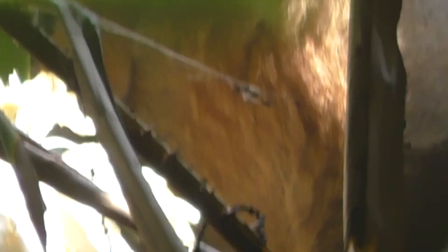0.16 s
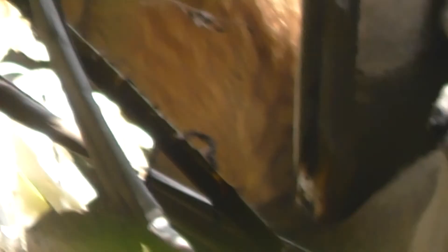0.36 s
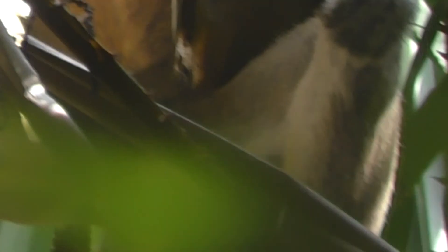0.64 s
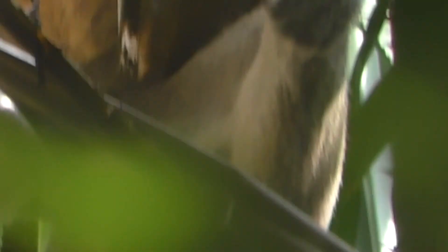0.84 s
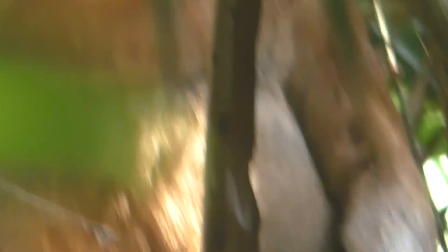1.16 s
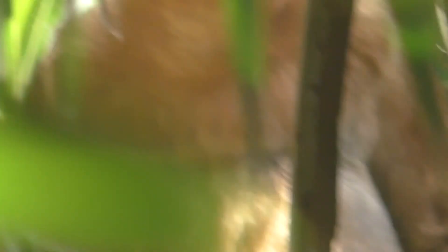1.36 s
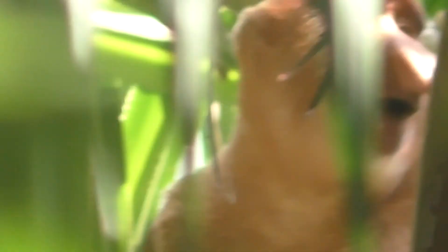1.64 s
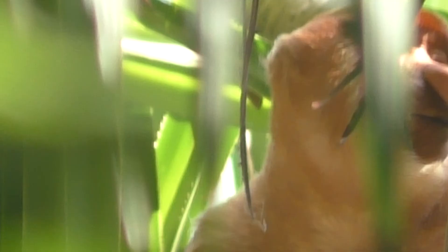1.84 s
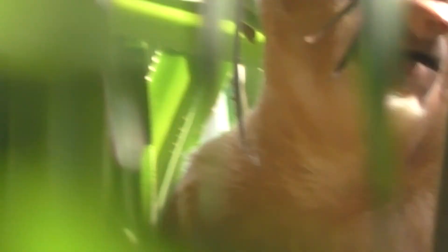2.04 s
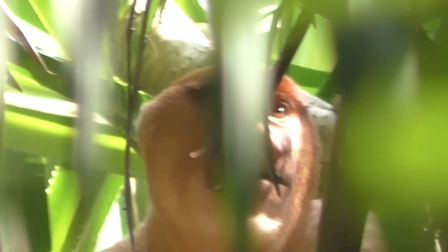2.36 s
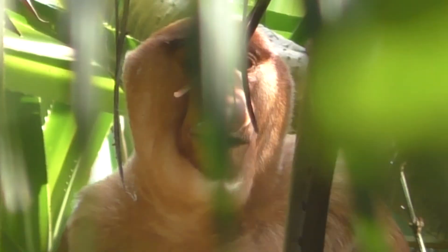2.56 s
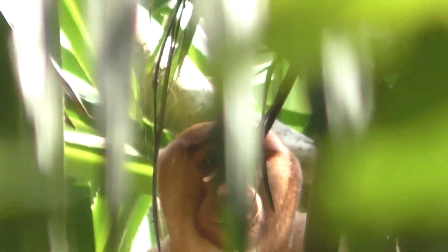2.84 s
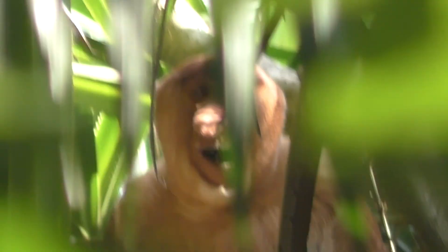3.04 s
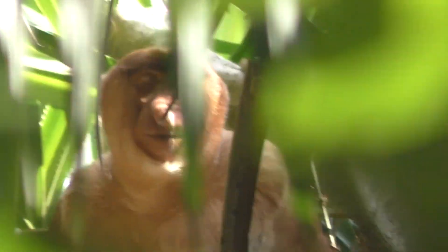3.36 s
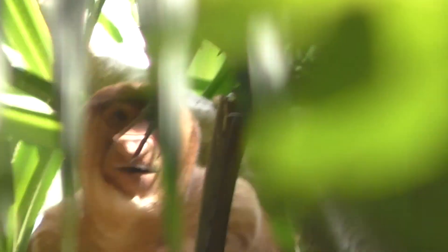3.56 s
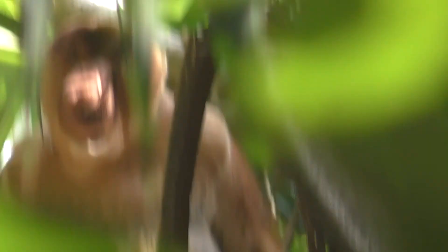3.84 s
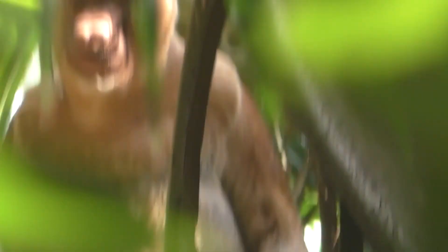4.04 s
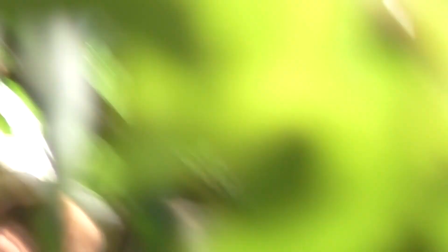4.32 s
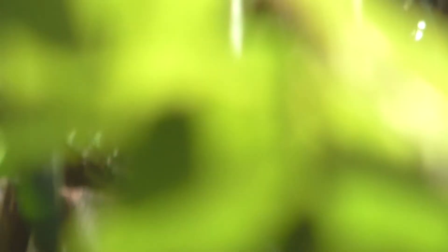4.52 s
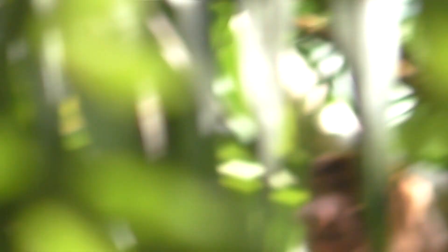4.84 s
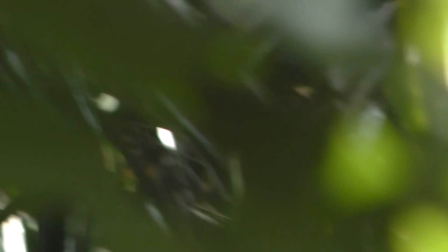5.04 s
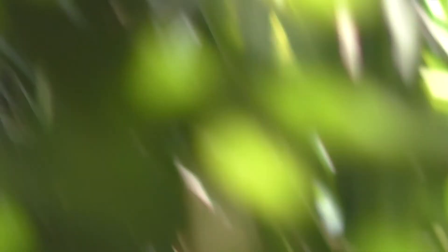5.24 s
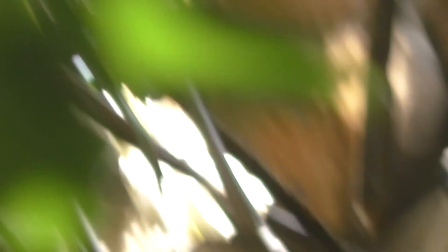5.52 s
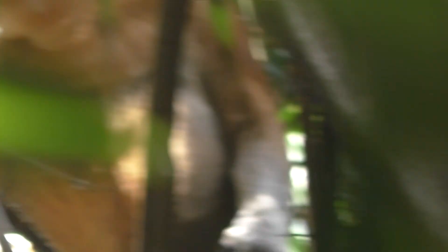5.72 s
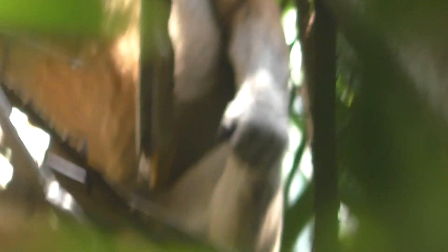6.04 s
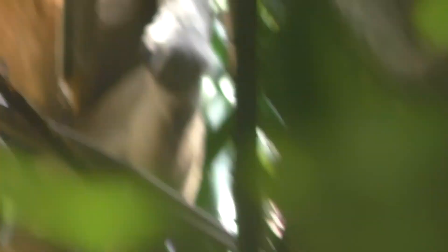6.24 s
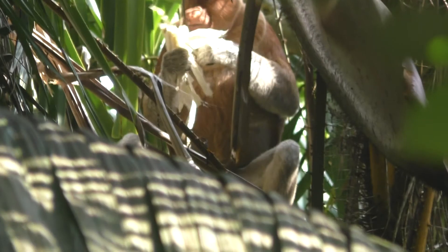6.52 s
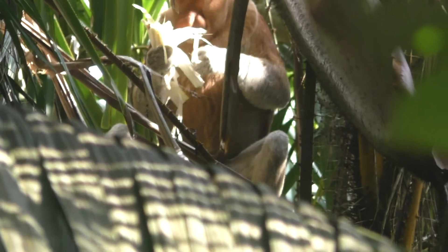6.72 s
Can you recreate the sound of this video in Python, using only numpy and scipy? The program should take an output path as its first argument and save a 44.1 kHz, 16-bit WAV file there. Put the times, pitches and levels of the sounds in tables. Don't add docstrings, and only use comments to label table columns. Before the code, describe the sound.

Outdoor stereo sound, dry and open, dominated by one shrill cicada. Its buzzing rasp tightens into a piercing whine around 3 kHz with stronger overtones high above, flickering through foliage, then breaks back into a dying rasp. This repeats four times over soft air and far insects. After an abrupt blink of silence comes a short remnant call, with small twig knocks, leaf clicks and brushing.

```python
import sys
import numpy as np
from scipy import signal
from scipy.fft import rfft, irfft, next_fast_len
from scipy.io import wavfile
from scipy.ndimage import uniform_filter1d, map_coordinates

SR = 44100
rng = np.random.default_rng(int(sys.argv[2]) if len(sys.argv) > 2 else 0)


def boost_factor(decibels):
    exponent = np.asarray(decibels, float) / 20
    return 10 ** exponent


def store_wav(level_fs):
    pcm = np.round(np.clip(np.atleast_2d(level_fs), -1, 1) * 32767)
    wavfile.write(sys.argv[1], SR, pcm.T.astype(np.int16))


N = 303849
T = np.arange(N) / SR

# (start [s], end [s])
GAP_S = (6.3946, 6.4)
TOP_HZ = 15830

# (frequency [Hz], density [dB per Hz])
RUMBLE_SPECTRUM = [(15, -58), (25, -11), (43, -22.5), (64, -8.5), (123, -9), (147, -7), (179, -8),
                   (221, -4), (253, -7.5), (352, -4.5), (600, -13.5), (780, -34), (1320, -120)]
# (frequency [Hz], density [dB per Hz])
LEAF_SPECTRUM = [(400, -40), (600, -10), (720, -2), (860, -6), (1160, -1), (2400, -6.5), (3600, -8),
                 (4300, -14.5), (10000, -12.5), (13500, -12), (15000, -42), (15900, -13)]
# (frequency [Hz], density [dB per Hz])
CHORUS_SPECTRUM = [(3900, -26), (5000, -10), (5700, -2.5), (6150, -0.5), (6600, -7.5), (7300, -11),
                   (9000, -22.5), (11000, -29.5)]
# (frequency [Hz], correlation [0-1])
LIKENESS = [(60, 0.11), (130, 0.41), (640, 0.63), (1400, 0.37), (3000, 0.7), (6000, 0.85), (7200, 1),
            (12000, 1)]
# (time [s], level [dB])
BREEZE = [
    (0, -53.5),
    (.13, -52),
    (.33, -55),
    (1.9, -57),
    (4.13, -57.5),
    (4.3, -52.5),
    (5.16, -55),
    (5.62, -57),
    (5.89, -55),
    (6.89, -53.5),
]
# (frequency [Hz], blur rate [knots/s], level [dB])
HUM_LINES = [(112, 13, -3), (153.7, 12, 3)]
# (time [s], half width [s], level [dB])
HUM_SWELLS = [
    (1.3, .5, -3),
    (2.2, 0.45, 3),
    (4.2, .4, -4),
    (6.55, .15, 6),
]

# (lock start [s], lock end [s], start pitch [Hz], sag [Hz/s])
PHRASES = [
    (0.153, 0.737, 3058, 57.9),
    (1.832, 2.313, 3042.5, 55.8),
    (3.53, 4.038, 3047, 62.1),
    (5.225, 5.798, 3043.6, 59.2),
    (6.399, 6.495, 3020, 59.7),
]
# (time [s], partial 4 [dB], dying [dB/s], held down under lock [dB], later pitch lift [Hz])
BREAKS = [
    (0.551, -33, 17, 0, 12.3),
    (2.421, -33, 24, 5, 54),
    (4.1, -31.5, 26, 12, 41),
    (5.86, -33, 29, 8, 70),
    (6.48, -33, 57, 0, 55),
]
CLICK_HZ = 323
LOCK_IN_S, LET_GO_S = 0.049, 0.03
HIGH_LINGERS_S, SECOND_EARLY_S = 0.08, 0.014
LEAD_S, ENTRY_DB, SETTLE_S = 0.13, -1.5, 0.14
MURMUR_DB, PAUSE_S, PAUSE_DB = -53, 0.079, -2
LOW_DB, LOW_FOLLOWS, LOW_HELD_DB = -45, 0.64, 4
REST_HZ, LIFT_HZ, LIFT_S = 2991, 37.9, 0.25
# (over partial 1 [dB], over partial 4 [dB], side [dB])
RASP_LEVELS = [(-0.5, -60, -9.5), (-4.5, -15.5, -19), (-8, -37, -16.5), (-40, -1.5, -27), (-20.5, -46, -32)]
# (shift [Hz], half width [Hz])
RASP_BANDS = [(85, 195), (0, 320), (70, 310), (25, 315), (-60, 380)]
# (shift [Hz], half width [Hz], level [dB])
RASP_SKIRT = (120, 1500, -17)
SIDEBANDS = [(-36, -21, -17, -22, -13.5, -22), (-36, -27, -15, -27, -21, -33),
             (-23, -7, -10, -30, -12, -20), (-40, -20, -16, -28, -15, -23), (-14, -14, -12, -30, -18, -24)]
# (shift [Hz], half width [Hz], level re partial [dB])
HAZE = [(0, 450, -23.5), (0, 680, -16), (-300, 1300, -6), (294, 750, -15.5), (-500, 700, 0)]
# (partial 1 [dB], partial 2 [dB], partial 3 [dB], partial 4 [dB])
PATHS = [(-39.5, -45.5, -55, -26.5), (-41.5, -35, -46.5, -29), (-40.5, -36, -46.5, -30.5),
         (-41, -37.5, -53, -29.5), (-50, -42, -59, -48)]
# (click shake [dB], echo beating of partial 1 [dB], of upper partials [dB])
SHAKE = [(-2, -9, -4), (-1, -8, -7), (0, -14, -7), (2, -14, -8), (0, -9, -9)]
# (time [s], half width [s], depth [dB])
CANCELS_1 = [(.16, 0.06, 7.5), (.22, 0.0074, 13), (.275, 0.011, 18), (.34, 0.015, 12.5), (.42, 0.024, 7),
             (.525, 0.006, 11), (.69, 0.1, 5.5), (1.9, 0.021, 4.5), (2.07, 0.019, 10), (3.73, 0.061, 9),
             (3.95, 0.019, 7.5), (5.35, .17, 11), (5.6, 0.021, 12)]
# (time [s], half width [s], depth [dB])
CANCELS_2 = [(.2, .08, 10), (.62, .08, 9.5), (1.86, 0.033, 10), (1.95, 0.049, 4), (2.075, 0.015, 9.8),
             (2.115, 0.012, 10), (2.31, 0.043, 10), (3.62, 0.14, 6.9), (3.96, 0.024, 12), (4.01, .05, 4.6),
             (5.22, 0.057, 12), (5.4, 0.11, 3.4), (5.615, 0.016, 12), (5.74, 0.064, 8.2)]
# (time [s], half width [s], depth [dB])
CANCELS_3 = [(.75, .1, 7), (2, .12, 11), (2.35, 0.078, 12), (3.62, 0.13, 11), (4.05, .1, 12),
             (5.49, 0.026, 9)]
# (time [s], half width [s], depth
# [dB])
CANCELS_4 = [(.2, 0.074, 8.6), (.5, 0.017, 10), (.76, .2, 18), (1.95, 0.032, 8.6), (2.035, 0.015, 7.2),
             (2.125, 0.01, 7.3), (2.18, .04, 5.7), (2.4, 0.048, 9.4), (3.63, 0.063, 8), (3.8, .015, 6),
             (3.94, 0.027, 9.3), (4.03, 0.0074, 10), (4.065, 0.0064, 6), (5.42, 0.034, 3),
             (5.78, 0.033, 9.1), (5.88, .07, 9.3), (6.46, .02, 12)]

# (time [s], peak [dB], pitch [Hz], t60 [s], pan [dB])
TICKS = [(4.27, -53, 732, 0.036, 7), (4.31, -46.5, 718, 0.12, -1), (4.68, -44, 1090, 0.044, 10),
         (6.414, -41, 183, 0.08, -2), (6.477, -43.5, 110, 0.074, 18), (6.499, -44, 150, 0.022, 8),
         (6.525, -47, 170, 0.033, 0), (6.567, -39, 190, .025, 0), (6.508, -36, 8800, .006, 0),
         (6.48, -46, 2050, .015, 0), (6.6, -35, 1500, 0.033, 7), (6.608, -31.5, 1110, 0.016, 4),
         (6.607, -38, 4670, 0.011, 2), (6.73, -40.5, 983, 0.043, 2), (6.765, -42, 850, .04, 0),
         (6.766, -36, 2900, 0.017, -3), (6.794, -37, 2400, .012, 9), (6.852, -32.5, 1200, 0.0092, -5),
         (6.863, -37.5, 440, 0.027, -2), (6.865, -34, 2860, 0.0068, -2)]
# (time [s], peak [dB], half length [s])
STROKES = [
    (6.452, -44.5, .02),
    (6.48, -42, .012),
    (6.508, -47, .015),
    (6.57, -47.5, 0.039),
    (6.606, -41, .003),
    (6.77, -54, 0.023),
    (6.863, -50, .004),
]


def unit(x):
    return x / np.sqrt(np.mean(np.abs(x) ** 2) + 1e-20)


def along(points, hz):
    f, v = np.transpose(points)
    return np.interp(np.log(hz + 1), np.log(f + 1), v)


def bump(t, s, width_s):
    return np.exp(-((t - s) / width_s) ** 2)


def ramp(t, length_s):
    return np.clip(t / length_s, 0, 1)


def wobble(rate, n=N):
    knots = rng.standard_normal(n * 600 // SR + 8)
    return map_coordinates(knots, [np.arange(n) * min(rate, 600) / SR])


def fading(rate, n=N):
    return (wobble(rate, n) + 1j * wobble(rate, n)) / np.sqrt(2)


def spread(mid, side, side_db):
    return np.array([mid + boost_factor(side_db) * side, mid - boost_factor(side_db) * side])


def blur(shift_hz, width_hz, steep, n=N):
    m = next_fast_len(n)
    hz = np.fft.fftfreq(m, 1 / SR)
    shape = (1 + ((hz - shift_hz) / width_hz) ** 4) ** -steep
    bins = np.exp(2j * np.pi * rng.random((2, m))) * rng.rayleigh(size=(2, m))
    return unit(np.fft.ifft(shape * bins)[:, :n])


def rush(spectrum, patchy_db):
    z = signal.stft(rng.standard_normal((2, N + 512)), nperseg=512)[2]
    patches = uniform_filter1d(rng.standard_normal(z.shape[1:]), size=6, axis=0)
    patches = uniform_filter1d(patches, size=14, axis=1)
    pair = signal.istft(z * boost_factor(patchy_db * unit(patches)), nperseg=512)[1]
    hz = np.fft.rfftfreq(pair.shape[1], 1 / SR)
    turn = np.arccos(np.clip(along(LIKENESS, hz), -1, 1)) / 2
    gain = boost_factor(along(spectrum, hz)) * [np.cos(turn), np.sin(turn)]
    mid, side = irfft(rfft(pair) * gain, pair.shape[1])[:, :N]
    return unit(spread(mid, side, 0))


def forest():
    breeze_db = np.interp(T, *np.transpose(BREEZE))
    rumble = boost_factor(0.48 * (breeze_db + 56.5) - 56) * rush(RUMBLE_SPECTRUM, patchy_db=0.5)
    leaves_db = 0.79 * (breeze_db + 58) - 52.5 + 0.15 * wobble(5.6)
    leaves = boost_factor(leaves_db) * rush(LEAF_SPECTRUM, patchy_db=0.88)
    chorus = boost_factor(-48 + 0.4 * wobble(1.5)) * rush(CHORUS_SPECTRUM, patchy_db=1.07)

    hum_db = -65.5 + sum(db * bump(T, s, width_s) for s, width_s, db in HUM_SWELLS)
    hum = 0
    for hz, knots, db in HUM_LINES:
        hum = hum + boost_factor(db) * (1 + 0.5 * fading(knots)) * np.exp(2j * np.pi * hz * T)
    hum = spread(hum, hum * fading(6), -12).real
    lean_right = boost_factor([[-0.4], [0.4]])
    return boost_factor(hum_db) * hum + lean_right * (rumble + leaves) + chorus


def rasp_effort():
    pitch_hz, murmur_db = np.full(N, REST_HZ, float), np.full(N, MURMUR_DB, float)
    power, under_lock = np.zeros(N), np.zeros(N)
    for (start, end, *_), (s, db, dying_db, held_db, after_hz) in zip(PHRASES, BREAKS):
        resumed = start > GAP_S[0]
        audible = T > GAP_S[1] * resumed
        since, after = T - start + resumed, np.maximum(T - s, 0)
        to_break = ramp(s - T, SETTLE_S)
        locked = ramp(since, SETTLE_S) * to_break * audible
        level_db = db - dying_db * after - held_db * locked + ENTRY_DB * to_break
        swell = ramp(since + LEAD_S, LEAD_S) ** 2
        power += (swell * boost_factor(level_db)) ** 2 * audible
        release = ramp(end + LET_GO_S - T, SETTLE_S / 2)
        under_lock += ramp(since, SETTLE_S) * release * (not resumed)
        murmur_db -= PAUSE_DB * bump(since, -LEAD_S - PAUSE_S / 2, PAUSE_S)
        pitch_hz += LIFT_HZ * bump(since, 0, LIFT_S / 2)
        pitch_hz += after_hz * after / LIFT_S * np.exp(1 - after / LIFT_S)
    high_db = 10 * np.log10(power + boost_factor(murmur_db) ** 2)
    low_db = LOW_DB + LOW_FOLLOWS * (high_db + 33) - LOW_HELD_DB * under_lock
    return pitch_hz, high_db, low_db


def rasp():
    pitch_hz, high_db, low_db = rasp_effort()
    phase = 2 * np.pi * np.cumsum(pitch_hz) / SR
    throb = boost_factor(0.7 * wobble(30))
    out = np.zeros((2, N))
    for k, ((over_low_db, over_high_db, side_db), band) in enumerate(zip(RASP_LEVELS, RASP_BANDS)):
        size = np.hypot(boost_factor(low_db + over_low_db), boost_factor(high_db + over_high_db))
        carrier = np.sqrt(2) * size * throb * np.exp(1j * (k + 1) * phase)
        out += spread(*(carrier * blur(*band, steep=0.9)), side_db).real
    shift_hz, width_hz, skirt_db = RASP_SKIRT
    skirt = boost_factor(high_db + skirt_db) * np.exp(4j * phase) * blur(shift_hz, width_hz, 0.5)
    return out + spread(*skirt, -22).real


def click_sidebands(t, bands_db, shake_db, rate):
    click = CLICK_HZ * t + rng.random()
    total = 0
    for m, under_db in zip((-3, -2, -1, -0.5, 1, 2), bands_db):
        line = np.exp(2j * np.pi * (m * click + (m % 2) * (m < 0) / 2))
        total = total + boost_factor(under_db + shake_db) * (0.85 + 0.5 * fading(rate, len(t))) * line
    return total


def whine():
    side_db = (-12, -17, -17, -19, -30)
    cancels = (CANCELS_1, CANCELS_2, CANCELS_3, CANCELS_4)
    out = np.zeros((2, N))
    for (start, end, hz, sag), path_db, (shake_db, *beat_db) in zip(PHRASES, PATHS, SHAKE):
        span = slice(round(start * SR), round((end + HIGH_LINGERS_S + LET_GO_S) * SR))
        t = T[span]
        n = len(t)
        levels_db = []
        for db, nulls in zip(path_db, cancels):
            levels_db.append(db - sum(depth * bump(t, s, width_s) for s, width_s, depth in nulls))
        levels_db.append(levels_db[3] - 40)
        phase = 2 * np.pi * np.cumsum(hz - sag * (t - start)) / SR
        begun = ramp(t - start + (start > GAP_S[0]), LOCK_IN_S)
        for k, (db, bands_db, apart_db, haze) in enumerate(zip(levels_db, SIDEBANDS, side_db, HAZE)):
            shift_hz, width_hz, haze_db = haze
            past = t - end
            lock_past = past - HIGH_LINGERS_S * ((k > 1) - 0.5)
            lock = begun * (1 - ramp(lock_past, HIGH_LINGERS_S / 2 + LET_GO_S))
            held_past = past - HIGH_LINGERS_S * (k > 1) + SECOND_EARLY_S * (k == 1)
            held = begun * (1 - ramp(held_past, LET_GO_S))
            beating = boost_factor(beat_db[k > 0] - 5 * (k == 1)) * fading(48, n)
            body = held * boost_factor(db) * (1 + beating)
            singer = lock * uniform_filter1d(boost_factor(db), size=SR // (1 + k))
            body = body + singer * click_sidebands(t, bands_db, shake_db, 14 + 8 * k)
            body = body + singer * boost_factor(haze_db) * blur(shift_hz, width_hz, 0.43, n)[0]
            tone = np.sqrt(2) * body * np.exp(1j * (k + 1) * phase)
            out[:, span] += spread(tone, tone * fading(19.7, n), apart_db).real
    return out


def rustle():
    out, t = np.zeros((2, N + SR)), np.arange(SR // 8) / SR
    for s, db, hz, t60, pan_db in TICKS:
        ring = np.sin(2 * np.pi * hz * t + 0.77 * wobble(hz / 5, len(t)))
        ring += 0.3 * rng.standard_normal(len(t)) * boost_factor(-60 * t / 0.004)
        ring *= boost_factor(db - 60 * t / t60) * (1 - np.exp(-t / (0.013 * t60)))
        out[:, round(s * SR):][:, :len(t)] += boost_factor([[pan_db / 2], [-pan_db / 2]]) * ring
    grains = boost_factor(5.7 * np.array([wobble(250), wobble(250)]))
    sos = signal.butter(4, [1500, 5500], "band", fs=SR, output="sos")
    brush = unit(signal.sosfilt(sos, grains * rng.standard_normal((2, N))))
    strokes = sum(boost_factor(db) * bump(T, s, length_s) for s, db, length_s in STROKES)
    return out[:, :N] + strokes * brush


def scene():
    return forest() + rasp() + whine() + rustle()


def band_limit(x):
    return signal.sosfilt(signal.butter(12, 15830, fs=SR, output="sos"), x)


def record(dry):
    m = next_fast_len(N)
    below_top = np.fft.rfftfreq(m, 1 / SR) < TOP_HZ
    limited = irfft(rfft(dry, m) * below_top, m)[:, :N]
    outside_gap_s = np.maximum(GAP_S[0] - T, T - GAP_S[1])
    return band_limit(limited * ramp(outside_gap_s, 0.0002))


dry = scene()
out = record(dry)
store_wav(out)
```